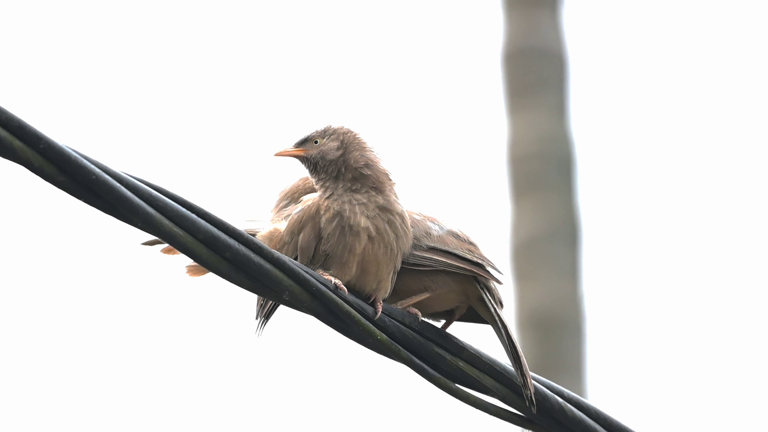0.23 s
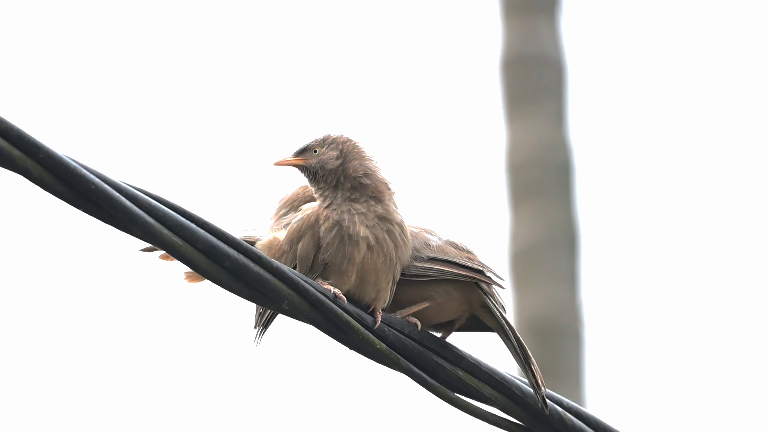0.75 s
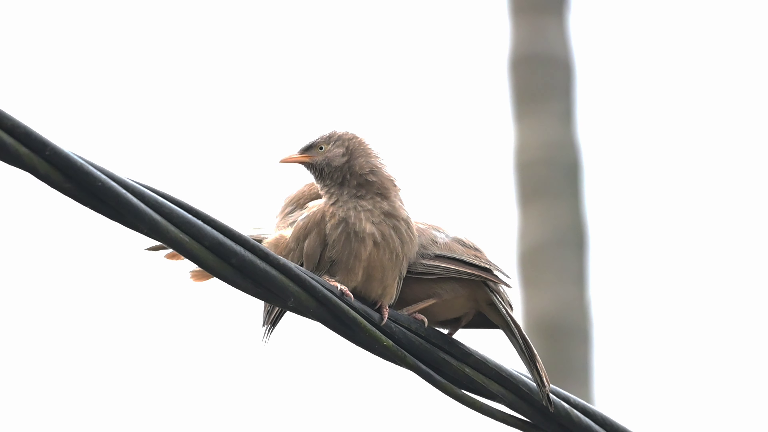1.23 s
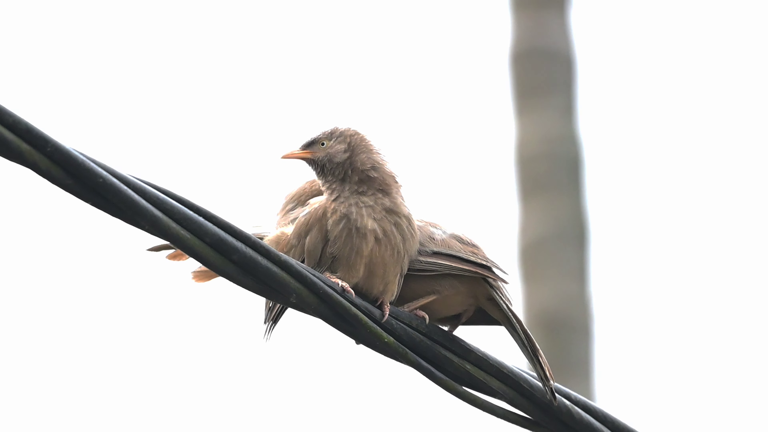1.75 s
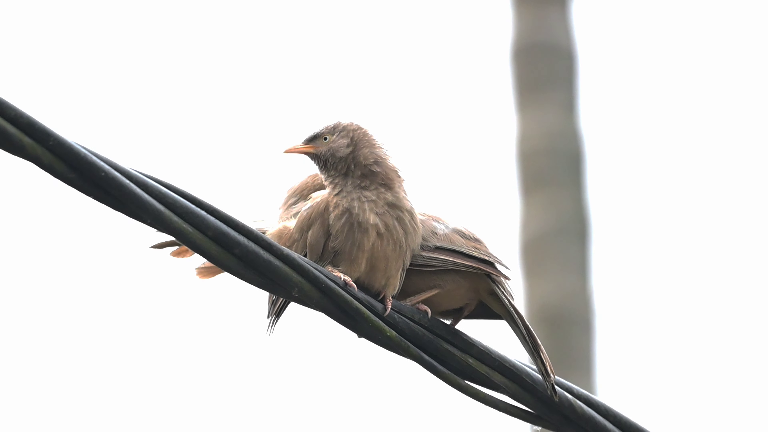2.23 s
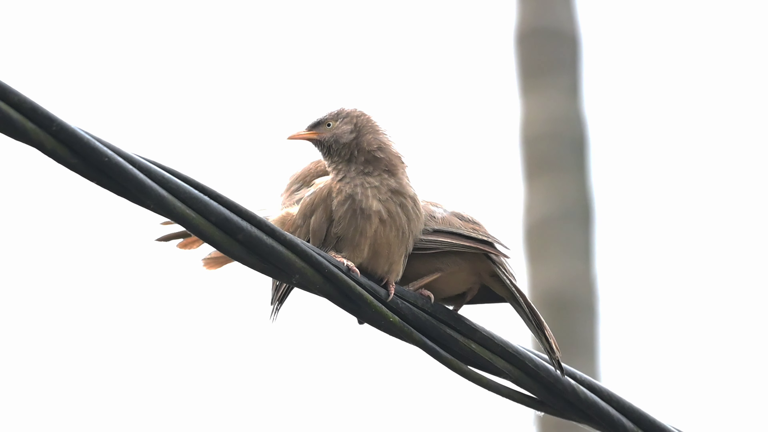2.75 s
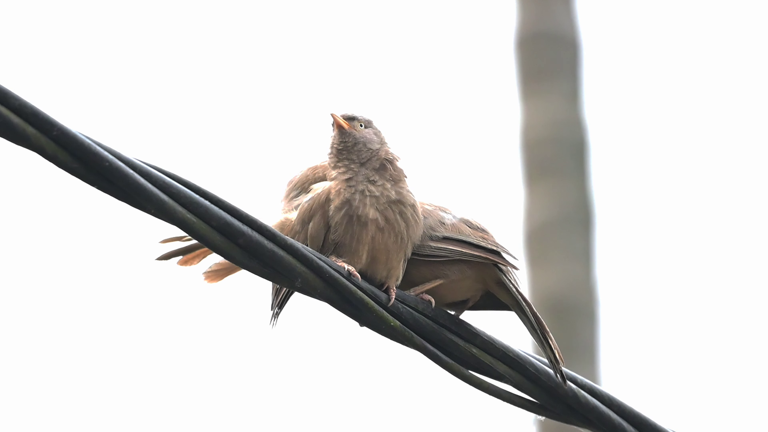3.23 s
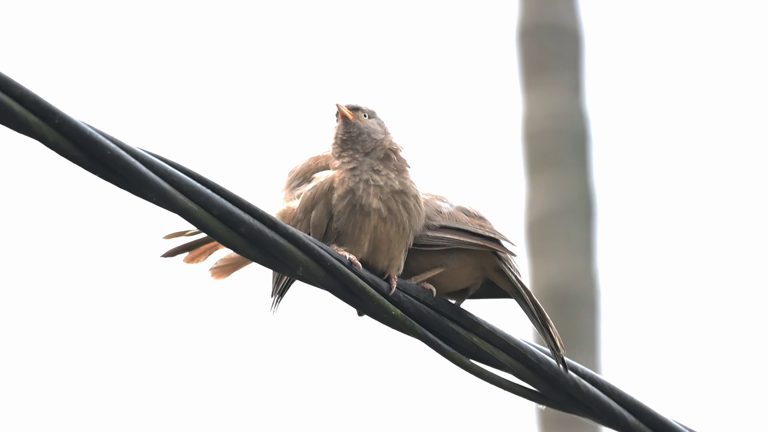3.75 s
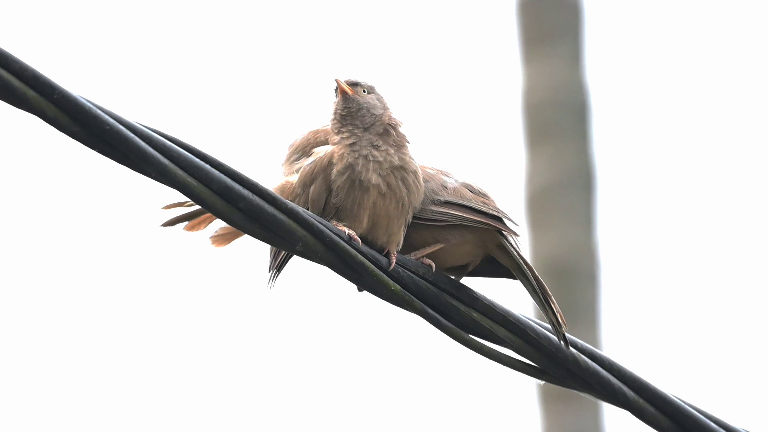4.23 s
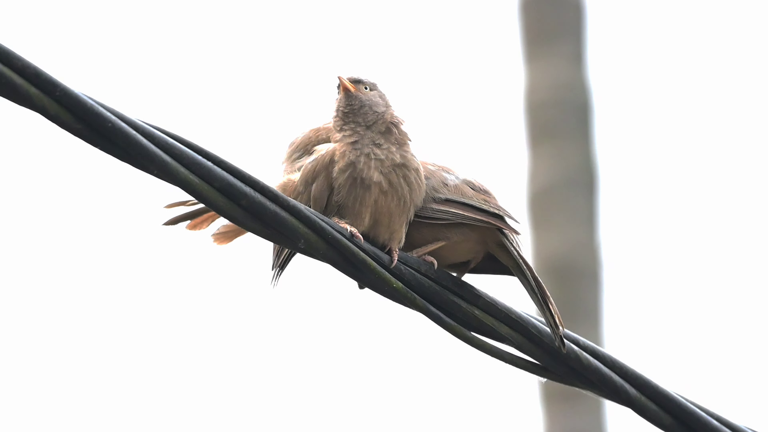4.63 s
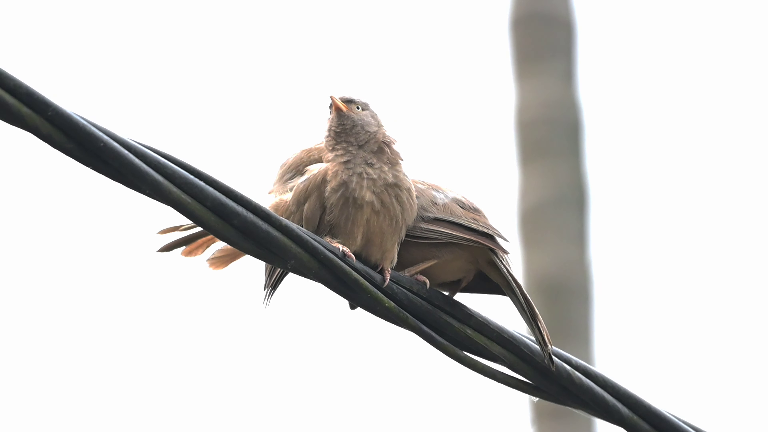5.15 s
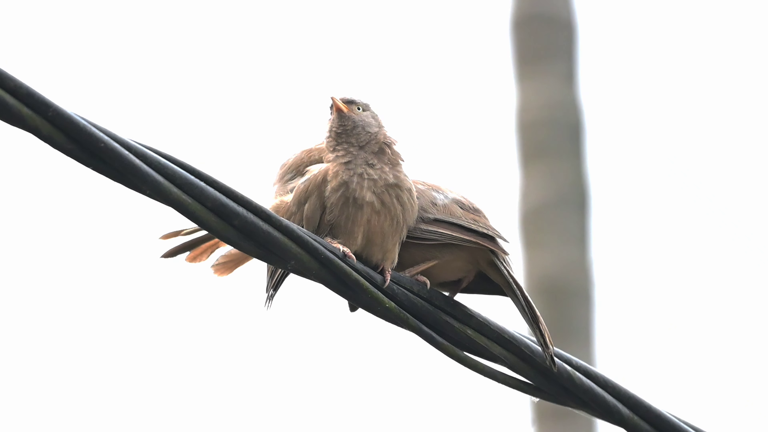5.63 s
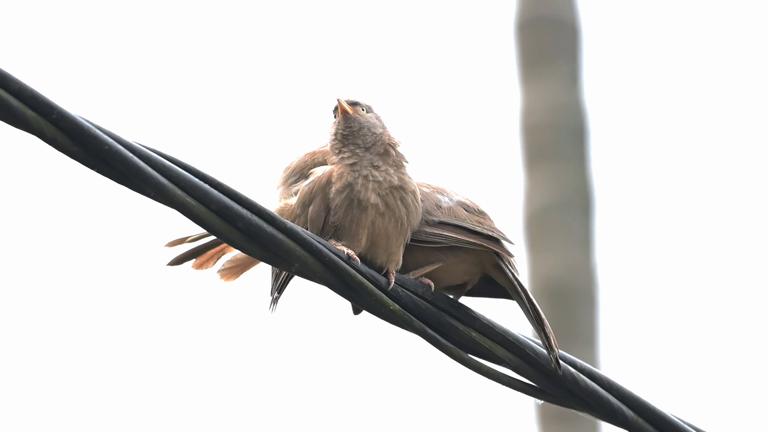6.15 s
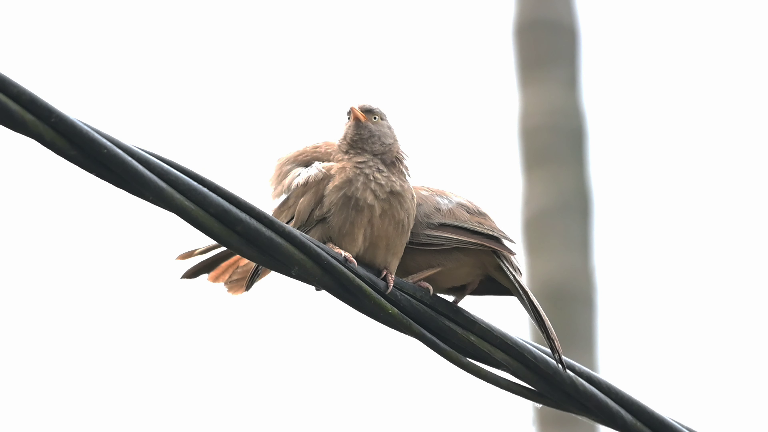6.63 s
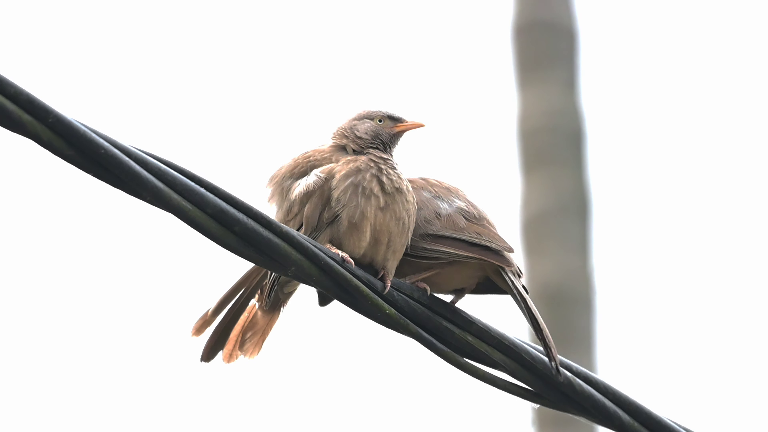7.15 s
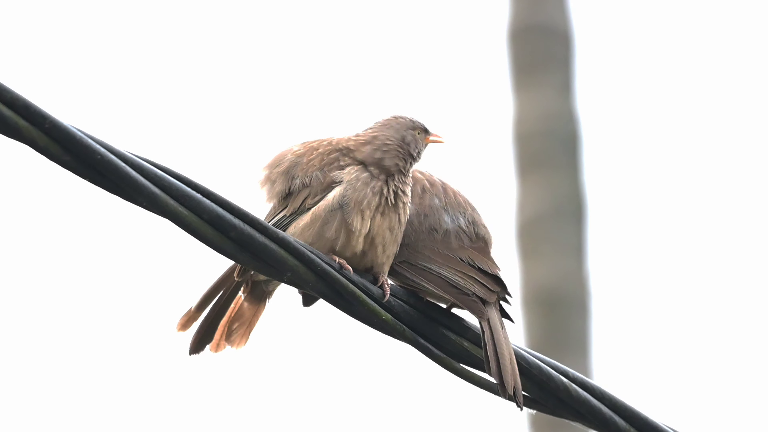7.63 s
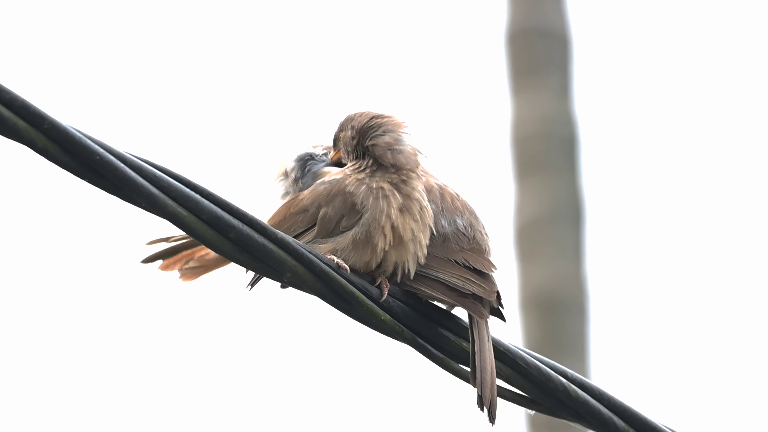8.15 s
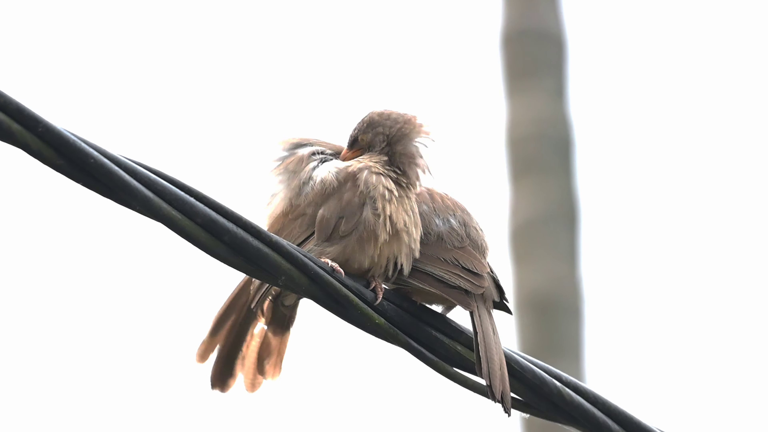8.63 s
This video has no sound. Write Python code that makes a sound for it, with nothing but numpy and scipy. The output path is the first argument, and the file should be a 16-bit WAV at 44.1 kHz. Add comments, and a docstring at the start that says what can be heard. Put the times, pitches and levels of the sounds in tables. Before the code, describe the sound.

Sparse high chirps and faint dove coos open an outdoor scene with a low, distant town rumble. One bird ticks into a short song, a warble buzzes, and a close bird whistles loudly four times, each note dipping and leaping. A dull knock falls among the whistles. After a sudden change, a group of babblers breaks into harsh calls and dense overlapping chatter over softly swelling leaf hiss.

```python
"""Small high chirps come first, scattered over a low town rumble, with a dove's soft coos beneath.
One bird ticks into a song, a warble buzzes past, then a near whistler dips and leaps four times.
Each call is a gliding tone from a bird's syrinx, ringing on among trees and walls; dull knocks fall close.
At 5.5 s the echo stops dead and a second moment of the morning begins: harsh scolds,
thickening chirps and a swelling hiss of leaves."""
import sys
import numpy as np
from scipy import signal
from scipy.io import wavfile
from scipy.ndimage import uniform_filter1d

SR = 44100
rng = np.random.default_rng(int(sys.argv[2]) if len(sys.argv) > 2 else 0)


def dump(signal):
    """Clip the signal to [-1, 1] and save it as 16-bit WAV at the path in sys.argv[1]."""
    limited = np.clip(np.atleast_2d(signal).T, -1, 1)
    pcm = np.round(limited * 32767).astype(np.int16)
    wavfile.write(sys.argv[1], SR, pcm)


N = 392049
CUT_S = 5.496  # the second moment begins
CLEAR_RASP = 0.007  # rasp is pitch shake as a share of the pitch; this little sounds pure

# faders of the bed, one list per moment: t/s, rumble/dB, deep bass/dB, leaves/dB
BED_LEVELS = [
    [(0.0, -61, -72, -85), (0.34, -64, -82, -80), (0.84, -65, -75, -79), (1.15, -63.5, -78, -81.5),
     (1.57, -73, -82.5, -83.5), (2.31, -67, -85, -84.5), (2.74, -63.5, -70.5, -79), (3.64, -62, -68, -83.5),
     (3.88, -55.5, -68.5, -77.5), (4.16, -58.5, -77.5, -86), (4.48, -60, -73.5, -79), (4.98, -63, -78, -76),
     (5.49, -62.5, -71.5, -76)],
    [(5.5, -54, -70, -77), (5.66, -63, -75, -84.5), (5.94, -65, -85, -74.5), (6.14, -61.5, -76.5, -70.5),
     (6.51, -56, -68, -64.5), (6.7, -56.5, -75, -63), (7.13, -57, -76, -63.5), (7.45, -54.5, -74, -59.5),
     (7.68, -56.5, -81, -60.5), (7.88, -55, -81.5, -60.5), (8.26, -53, -76, -58), (8.53, -53, -76, -57),
     (8.89, -52, -76, -56)],
]
# tone colours of the bed: f/Hz, relative density/dB
BASS_SPECTRUM = [(15, -38.5), (25, -7), (97, 15), (140, -5), (180, -40.5), (310, -120)]
RUMBLE_SPECTRUM = [(71, -42.5), (120, -12), (212, -18), (272, -6.5), (413, -2), (512, -5.5), (1040, -15),
                   (1130, -11), (1400, -9.5), (1680, -14.5), (2120, -10.5), (4810, -25), (6250, -48),
                   (10600, -120)]
LEAF_SPECTRUM = [(4500, -7.5), (6000, -1), (8000, -5), (10000, -8.5), (11500, -5.5), (13000, -28.5)]
# the far flock, one list per moment: t/s, level/dB, centre f/Hz
FLOCK_CONTOUR = [
    [(0.0, -73, 3700), (.2, -71, 4480), (.45, -82, 3410), (.93, -69.5, 3600), (1.4, -69.5, 2800),
     (1.55, -95, 3480), (2.03, -77, 3420), (2.25, -88, 4530), (2.58, -63, 4104), (2.9, -51.5, 3527),
     (3.18, -42.5, 2786), (3.45, -47.5, 3290), (3.65, -61, 2984)],
    [(5.5, -67.5, 3313), (5.8, -74.5, 4000), (5.95, -63, 4500), (6.2, -50.5, 2990), (6.55, -47, 4000),
     (6.85, -49.5, 3000), (7.05, -42, 3013), (7.62, -43, 3595), (7.95, -51, 3898), (8.33, -47, 3098),
     (8.65, -52.5, 3450), (8.89, -45, 3284)],
]
# close knocks: t/s, level/dB, ring f/Hz, t60/s, relative scuff level/dB
CLOSE_KNOCKS = [(1.805, -48.5, 263, 0.22, -1), (1.819, -45.5, 492, 0.14, -4), (2.056, -50, 300, 0.17, 2),
                (3.925, -19, 287, 0.14, -15.5), (5.599, -47.5, 660, 0.15, 4),
                (6.564, -31.5, 497, 0.23, -11)]
# thin overload overtones that only the loudest notes bring out:
# multiple of the pitch, relative level/dB at a drive of 1
LOUD_NOTE_OVERTONES = [(2, -40), (3, -60.5), (5, -56.5), (7, -63.5)]
# the dove: t/s, length/s, first f/Hz, last f/Hz, level/dB, rasp, bend, echo send/dB
DOVE_COOS = [(.71, 0.031, 636, 638, -55.5, 0.054, 3, 2), (1.1, 0.14, 502.7, 503, -54, 0.071, -9, -6),
             (2.39, .11, 684, 562, -50, 0.027, 4.5, -2.5), (2.751, 0.15, 516, 513.4, -51, 0.068, 2.5, -5),
             (5.5, .36, 570.6, 647.6, -57, 0.091, 4.5, -7)]
# chirps all around and, at 4.75 s, a faint steady low tone beneath the near whistles: same columns
SINGLE_NOTES = [(0.0, 0.03, 4020, 3430, -45.5, 0.02, 0, -1),
                (0.101, 0.098, 2570, 2850, -58.5, 0.082, 2, -2),
                (.13, 0.14, 1844, 1940, -56.5, 0.08, 4.5, -1.5), (.21, 0.053, 5000, 4810, -56, .05, -1, 4),
                (.29, .03, 2140, 2390, -53, 0.065, -3, -5.5), (.5, 0.068, 2075, 2804, -42, .004, -3.5, -7),
                (0.589, .06, 2790, 3020, -50, 0.0016, 0.5, 4), (.65, .11, 3020, 2870, -50, 0.0032, 0, -5),
                (.51, 0.028, 3540, 3230, -44, 0.0098, -1, -1),
                (0.521, 0.17, 1862, 1949, -49.5, 0.023, 2, -3.5),
                (.55, 0.037, 4170, 3466, -43.5, .02, -1.5, 0),
                (.815, 0.016, 3400, 3216, -43.5, .006, -6, -3.5), (.93, 0.042, 1860, 1876, -61, 0.03, 7, 5),
                (1.14, 0.038, 2580, 2404, -52, 0.044, 3, -4.5), (1.2, .05, 4850, 4550, -56, 0.018, 4.5, -2),
                (1.349, 0.032, 2570, 2370, -56.5, 0.018, -7, -21),
                (1.578, .03, 5020, 5050, -77, 0.036, 4, 10), (1.639, 0.024, 4300, 4150, -74, .01, -4, -3),
                (1.879, .015, 4950, 3630, -62, 0.014, 0.5, -4),
                (1.911, 0.054, 3580, 3360, -63, 0.022, -5.5, 2),
                (1.99, 0.014, 4200, 4150, -66, .008, -10, -1), (2.07, .015, 5150, 4460, -69, 0.0073, -3, 3),
                (2.219, 0.097, 3480, 3070, -67.5, .014, 1.5, -5),
                (2.289, .07, 3050, 3410, -69, .014, 1.5, 0),
                (2.548, 0.048, 2100, 2680, -56, 0.033, -2, -.6), (2.6, .09, 2680, 2335, -64, .03, 0, 1),
                (2.558, .03, 4980, 4500, -47.5, .015, 3, 4), (4.75, 0.46, 830, 818, -68, .03, 0, -5),
                (5.5, 0.1, 2112, 2086, -59, 0.086, -1, 4.5), (5.62, .02, 3520, 3150, -52, .027, 1, -6.5),
                (5.648, 0.021, 3740, 3770, -50.5, 0.018, 0.5, -0.5),
                (5.944, .025, 5200, 3850, -45.5, .012, -2, 0),
                (6.015, 0.016, 3990, 3600, -47.5, .006, -1.5, 3),
                (6.125, 0.014, 5120, 5200, -58, 0.0066, 7, -1), (6.2, 0.054, 3730, 3600, -48, 0.023, -2, 6),
                (6.33, 0.049, 4560, 4730, -49, 0.029, 4.5, 3.5),
                (6.373, 0.027, 5310, 3620, -37, 0.0066, -0.5, -.6),
                (6.411, 0.028, 1690, 2990, -35.5, 0.0054, 1, -1),
                (6.441, 0.059, 2230, 1791, -33, 0.004, 3.5, -4),
                (6.459, 0.024, 4800, 4680, -44.5, 0.049, -6, -0.5),
                (6.565, 0.015, 4800, 4600, -47.5, .006, -2, 2.5),
                (6.589, 0.015, 5140, 3500, -34.5, .007, -1, -1),
                (6.64, 0.084, 8980, 5420, -51, 0.076, 1.5, 2.5),
                (6.679, 0.041, 3390, 2950, -42, 0.053, -0.5, 3.5),
                (6.782, 0.023, 3600, 3430, -48, 0.064, -1.5, 12.5),
                (6.791, 0.027, 5220, 4990, -48.5, 0.068, -0.5, 10.5),
                (6.859, 0.039, 4610, 4700, -51.5, .07, -3, 16),
                (7.12, 0.029, 1502, 2940, -33, 0.0034, 2.5, -6),
                (7.149, 0.086, 2240, 1758, -30.5, 0.005, 4.5, -4),
                (7.33, 0.0089, 4440, 4780, -40.5, .044, 3, -3),
                (7.351, 0.035, 2990, 3010, -34, 0.042, 1, -2),
                (7.38, 0.036, 6240, 6130, -52, 0.056, -3.5, 11),
                (7.41, 0.037, 3400, 3384, -41, 0.058, -3, 2),
                (7.499, 0.051, 4570, 4550, -53, .005, -1.5, -1),
                (7.595, 0.067, 5100, 4005, -31.5, 0.077, 0, -0.5),
                (7.589, 0.069, 3100, 3320, -37.5, .1, 2.5, -1.5),
                (7.699, 0.036, 2930, 3156, -34, 0.063, 2.5, -0.5),
                (7.714, 0.068, 2480, 2445, -38.5, 0.084, -7, -2.5),
                (7.745, 0.013, 4290, 4390, -38.5, 0.0067, 2, -8),
                (7.774, 0.035, 2294, 1862, -36, 0.0046, -0.8, 0),
                (7.864, 0.051, 1706, 1695, -45, .006, -4, -1.5),
                (7.92, 0.014, 4830, 4990, -42, 0.04, -1.5, 1.5),
                (7.995, 0.039, 5280, 2955, -35.5, .006, 0.5, -1),
                (8.05, 0.13, 2326, 2123, -39, 0.047, 5.5, -3),
                (8.177, 0.048, 2346, 2477, -31, 0.0078, 4.5, -7),
                (8.222, 0.028, 2480, 3070, -24, 0.011, 2, 0), (8.31, 0.017, 4870, 6320, -37, .005, 0.5, 3),
                (8.316, 0.032, 2928, 3180, -32, .006, 0, 0.5),
                (8.33, 0.021, 5490, 5570, -36, 0.059, 12, -5), (8.336, 0.027, 7100, 6500, -49, .12, -2, -1),
                (8.336, 0.0344, 4460, 3850, -36.5, 0.146, 0.5, 0.5),
                (8.367, .047, 3900, 2588, -24.5, 0.012, 4, 0.5),
                (8.401, 0.052, 3714, 3120, -26.5, 0.0053, 0.9, -1.5),
                (8.465, 0.069, 1492, 1365, -52, 0.035, -0.5, -8),
                (8.499, .03, 4150, 3620, -34.5, .046, 4.5, -5),
                (8.529, 0.062, 6980, 6100, -48.5, .12, 1, 0.5),
                (8.547, .08, 2120, 1860, -35.5, 0.083, 5.5, -3.5),
                (8.56, 0.058, 2855, 3850, -38, 0.069, -0.5, -9),
                (8.672, 0.053, 4100, 3294, -32, 0.0036, 4.5, 7),
                (8.727, 0.0443, 3320, 3620, -30.5, 0.0039, 0.4, 3),
                (8.775, 0.12, 3590, 3750, -35.5, .015, -2, -2),
                (8.685, 0.013, 5740, 4300, -31, .012, 2.5, 2),
                (8.776, 0.046, 3326, 2096, -24.5, 0.011, 1, -0.5),
                (8.866, 0.046, 1885, 2040, -31.5, 0.0065, 0, -9)]
# ticks that open a song: t/s, level/dB
SONG_TICKS = [(2.184, -62), (2.216, -56), (2.293, -51), (2.393, -45.5), (2.501, -45.5), (2.612, -49.5)]
# its flick-and-slur pairs: t/s, flick level/dB, slur level/dB, slur end f/Hz
SONG_PAIRS = [(2.706, -44.5, -41.5, 2840), (2.874, -39.5, -40.5, 2410), (3.035, -39, -40.5, 2460),
              (3.205, -31, -41, 2610), (3.378, -36.5, -44, 2990)]
# a run of four upturned notes: t/s, first f/Hz, level/dB
CURL_NOTES = [(7.846, 4230, -44.5), (7.96, 3940, -42), (8.075, 4070, -41.5), (8.201, 3930, -37.5)]
# quick arched chips: t/s, length/s, foot f/Hz, top f/Hz, level/dB
CHIP_NOTES = [(0.257, 0.024, 4090, 5030, -39.5), (0.854, 0.033, 3420, 3830, -45),
              (5.902, 0.021, 4210, 4700, -42), (8.709, 0.019, 4160, 4880, -24)]
# harsh scolds: t/s, top f/Hz, fall/s, hold/s, held f/Hz, level/dB, echo send/dB
SCOLD_NOTES = [(6.154, 5090, .042, 0.078, 2618, -31, 0), (6.853, 3800, .032, 0.059, 2610, -25, -0.5)]
# outline of the warble: t/s, lowest f/Hz, highest f/Hz, level/dB
WARBLE_CONTOUR = [(3.157, 1450, 2400, -35), (3.181, 1452, 2510, -27.5), (3.212, 1438, 2652, -27),
                  (3.239, 1438, 2545, -28.5), (3.27, 1489, 2898, -24.5), (3.315, 1620, 2770, -33.5)]
# bright flares in the near whistles: t/s, level/dB, f/Hz
WHISTLE_FLARES = [(3.712, -49, 6630), (3.712, -54, 4500), (3.745, -51.5, 6410), (3.831, -55, 6090),
                  (3.865, -44, 5710), (3.892, -42.5, 5600), (4.252, -45.5, 6554), (4.254, -42.5, 4380),
                  (4.392, -45, 5830), (4.415, -51, 5530), (4.574, -50.5, 5210), (4.608, -49.5, 6970),
                  (4.61, -46.5, 4710), (4.763, -45, 5240), (5.41, -53, 5530)]
# the near whistles: t/s, time to the leap/s, length/s, dip f/Hz, leap f/Hz,
# opening/dB, dip/dB, break/dB, leap/dB, closing/dB
WHISTLE_NOTES = [(3.674, 0.13, .25, 2043, 3040, -30, -16.5, -30, -18, -16),
                 (4.206, .14, .25, 2065, 3012, -29, -16, -27.5, -20.5, -17),
                 (4.567, .13, .225, 2290, 2858, -15.5, -18.5, -47, -21.5, -15.5),
                 (5.206, 0.13, 0.24, 1967, 3001, -28.5, -17, -33, -21.5, -17)]
# pitch before the leap: share of the time, share of the dip
DIP_SHAPE = [(0, -0.089), (.19, .52), (0.381, .92), (0.599, 0.98), (.72, .8), (0.861, -.3)]
# pitch after the leap: share of the time, share of the way home
SAG_SHAPE = [(0, 0), (0.348, 0.16), (.7, .65), (.99, 0.97)]


def undb(db):
    return 10 ** (np.asarray(db) / 20)


def unit_rms(x):
    return x / np.sqrt(np.mean(x ** 2))


def butter(x, order, hz, kind="low"):
    return signal.sosfilt(signal.butter(order, hz, kind, fs=SR, output="sos"), x)


def drift(rate_hz):
    """A smooth random wander with a spread near 1."""
    hold = int(SR / rate_hz)
    steps = np.repeat(rng.standard_normal(N // hold + 1), hold)
    return 1.1 * uniform_filter1d(uniform_filter1d(steps, hold), hold)[:N]


def stereo(mid, side, side_db):
    return np.array([mid + undb(side_db) * side, mid - undb(side_db) * side])


def echo(x, t60, treble_t60, near_t60, near_db, onset_s):
    """Trees and walls: a quick scatter of near reflections, then a dense tail that loses treble first."""
    s = np.arange(int(1.8 * SR)) / SR
    noise = rng.standard_normal((2, len(s)))
    low = signal.sosfiltfilt(signal.butter(2, 4000, fs=SR, output="sos"), noise)
    low_fade, treble_fade, near_fade = (np.exp(-np.log(1000) * s / t) for t in (t60, treble_t60, near_t60))
    tail = low * low_fade + (noise - low) * treble_fade + undb(near_db) * near_fade * noise
    tail *= np.clip(s / onset_s, 0, 1)
    tail /= np.sqrt(np.sum(tail[0] ** 2))
    mid, side = signal.fftconvolve(x[None], tail, axes=1)[:, :N]
    return stereo(mid, butter(side, 2, 3600), side_db=-11)  # the treble stays centred


def noise_bands(spectrum, step_octaves, flicker_db, swell_db):
    """Noise bands that swell together and flicker alone."""
    hz, db = np.transpose(spectrum)
    out, swell = 0, drift(4.6)
    for f in hz[0] * 2 ** np.arange(0, np.log2(hz[-1] / hz[0]), step_octaves):
        edges_hz = [f * 2 ** -step_octaves, f * 2 ** step_octaves]
        mid, side = butter(rng.standard_normal((2, N)), 3, edges_hz, "band")
        band_db = np.interp(np.log(f), np.log(hz), db) + swell_db * swell + flicker_db * drift(9)
        out = out + undb(band_db) * stereo(mid, side, side_db=-18.5)
    return unit_rms(out)


def hum(hz=276):
    """A faint tone that wavers in pitch and level."""
    size = undb(-12.5 + 3.9 * drift(3.8))
    return size * np.sin(2 * np.pi * np.cumsum(hz * (1 + .012 * drift(11))) / SR)


def town_and_leaves(s):
    """The bed: deep bass, town rumble with a hum riding on it, and leaf hiss."""
    t, *faders = np.transpose(BED_LEVELS[0] + BED_LEVELS[1])
    rumble_gain, bass_gain, leaf_gain = (undb(np.interp(s, t, db)) for db in faders)
    bass = noise_bands(BASS_SPECTRUM, step_octaves=.36, flicker_db=1, swell_db=-1.7)
    rumble = noise_bands(RUMBLE_SPECTRUM, step_octaves=.5, flicker_db=1.5, swell_db=.5)
    leaves = noise_bands(LEAF_SPECTRUM, step_octaves=.25, flicker_db=.7, swell_db=.2)
    return bass_gain * bass + rumble_gain * (rumble + hum()) + leaf_gain * butter(leaves, 6, 12400)


def quaver(rate_hz=75):
    """The rasp in a bird's voice: an uneven fast swing with jitter on top."""
    return np.sin(2 * np.pi * np.cumsum(rate_hz + 20 * drift(30)) / SR) + .45 * drift(400)


def add_tone(track, t, hz, db, rasp, shake, edge_s, overtones=()):
    """Adds one gliding tone through the points (t, hz, db); rasp shakes its pitch and level."""
    i = np.arange(max(int((t[0] - edge_s) * SR), 0), min(int((t[-1] + edge_s) * SR), N))
    s = i / SR
    pitch = uniform_filter1d(np.interp(s, t, hz), size=200, mode="nearest")
    phase = 2 * np.pi * np.cumsum(pitch * (1 + rasp * shake[i])) / SR
    fades = np.clip(np.minimum(s - t[0], t[-1] - s) / edge_s + 1, 0, 1) ** 2
    size = fades * undb(np.interp(s, t, db) + 14 * rasp * shake[i])
    drive = np.minimum(size / .33, 1.5)  # only the loudest notes bring out the overload overtones
    upper = sum(undb(level) * np.sin(k * phase) for k, level in overtones if k * max(hz) < SR / 2)
    track[i] += size * (np.sin(phase) + drive * upper)


def far_flock(s, count=600):
    """A wash of far raspy chirps at random moments, most gliding down."""
    t, db, hz = np.transpose(FLOCK_CONTOUR[0] + FLOCK_CONTOUR[1])
    level_db, centre_hz = np.interp(s, t, db), np.interp(s, t, hz)
    level_db[(s > FLOCK_CONTOUR[0][-1][0]) & (s < CUT_S)] = -90  # hushed behind the near whistler
    track, shake = np.zeros(N), quaver()
    for when, height, fall, length, loud in rng.random((count, 5)):
        start = when * N / SR
        first_hz = centre_hz[int(when * N)] * 2 ** (.87 * (height - .5))
        last_hz = first_hz * 2 ** (.2 - .6 * fall)
        add_tone(track, [start, start + .012 + .06 * length], [first_hz, last_hz],
                 [8 * loud, 8 * loud - 3], rasp=.06, shake=shake, edge_s=.008)
    wash = echo(track, t60=.99, treble_t60=.68, near_t60=.033, near_db=20.5, onset_s=.0013)
    return undb(uniform_filter1d(level_db, size=900)) * unit_rms(wash)


def knocks():
    """Each close knock is a short click, a dull ring and a scuff of noise."""
    track, s = np.zeros(N + SR), np.arange(SR // 4) / SR
    click = np.exp(-(s / .00024 - 2) ** 2)
    for t, db, hz, t60, scuff_db in CLOSE_KNOCKS:
        fade = np.exp(-np.log(1000) * s / t60)
        ring = .08 * np.sin(2 * np.pi * hz * s)
        scuff = undb(scuff_db) * signal.lfilter([.3], [1, -.75], rng.standard_normal(len(s)))
        track[int(t * SR):][:len(s)] += undb(db) * (click + fade * (ring + scuff))
    return butter(track[:N], 2, [200, 1800], "band")


def glide(start, length, first_hz, last_hz, db, rasp, bend, echo_db, throat_hz=3550):
    """A note as (t, hz, db, rasp, echo_db), loudest where it comes nearest the throat's resonance."""
    progress = np.linspace(0, 1, 12)
    bend += 1e-6  # above 0 the pitch moves early, below 0 late
    hz = first_hz + (last_hz - first_hz) * np.expm1(-bend * progress) / np.expm1(-bend)
    octaves = np.log2(hz / throat_hz)
    throat_db = np.where(octaves > 0, -26 * octaves, 10.5 * octaves)
    swell_db = np.interp(progress, [0, .35, 1], [-.5, 0, -1])
    return start + length * progress, hz, db + swell_db + throat_db - throat_db.max(), rasp, echo_db


def lone_notes():
    """The dove's coos, scattered chirps and a faint steady low tone beneath the near whistles."""
    return [glide(*row) for row in DOVE_COOS + SINGLE_NOTES]


def song():
    """Falling ticks, then pairs of a clear upward flick and a raspy falling slur."""
    notes = [glide(t, .008, 5800, 4250, db, rasp=.045, bend=0, echo_db=5) for t, db in SONG_TICKS]
    slur_s, slur_rasp, slur_echo_db = np.array([.038, .047, .096]), .025, 0
    for t, flick_db, slur_db, end_hz in SONG_PAIRS:
        notes.append(glide(t, .017, 2950, 3634, flick_db, CLEAR_RASP, bend=0, echo_db=5))
        db = slur_db + np.array([-.5, 0, -2])
        notes.append((t + slur_s, [4620, 4800, end_hz], db, slur_rasp, slur_echo_db))
    return notes


def curls():
    """Clear notes that curl up at the end."""
    return [glide(t, .064, hz, 1.15 * hz, db, CLEAR_RASP, bend=-3, echo_db=-8)
            for t, hz, db in CURL_NOTES]


def chips(foot_db=-13.5, echo_db=-1.5):
    """Quick arches of pitch, loudest at the top."""
    return [([t, t + length / 2, t + length], [foot_hz, top_hz, foot_hz],
             [db + foot_db, db, db + foot_db], CLEAR_RASP, echo_db)
            for t, length, foot_hz, top_hz, db in CHIP_NOTES]


def scolds(rasp=.044, rise_db_per_octave=19, fade_db=6.5):
    """A straight fall that grows louder and lands on a held, fading rasp."""
    notes = []
    for t, top_hz, fall, hold, held_hz, db, echo_db in SCOLD_NOTES:
        levels = [db - rise_db_per_octave * np.log2(top_hz / held_hz), db, db - fade_db]
        notes.append((t + np.cumsum([0, fall, hold]), [top_hz, held_hz, held_hz], levels, rasp, echo_db))
    return notes


def warbler(s, swing_hz=80.9, crest_s=2.1):
    """A whistle swung up and down so fast that it buzzes, loudest at the top of each swing."""
    t, low_hz, high_hz, db = np.transpose(WARBLE_CONTOUR)
    swing = .5 + .5 * np.cos(2 * np.pi * swing_hz * (s - crest_s))
    hz = np.interp(s, t, low_hz) + swing * np.interp(s, t, high_hz - low_hz)
    size = undb(np.interp(s, t, db, -120, -120) - 10 * (1 - swing) ** 2)
    return uniform_filter1d(size, size=100) * np.sin(2 * np.pi * np.cumsum(hz) / SR)


def flares(shake):
    """Rough bright bursts above the near whistle, each sagging a little."""
    track = np.zeros(N)
    for t, db, hz in WHISTLE_FLARES:
        add_tone(track, [t + .004, t + .018], [hz, .98 * hz], [db, db - 3],
                 rasp=.025, shake=shake, edge_s=.008)
    return track


def near_whistler(home_hz=2591, echo_db=-5.5):
    """The lead voice dips from its home pitch, breaks, leaps up and sags back."""
    dip_time, dip_depth = np.transpose(DIP_SHAPE)
    sag_time, sag_depth = np.transpose(SAG_SHAPE)
    notes = []
    for start, leap, length, dip_hz, leap_hz, *levels in WHISTLE_NOTES:
        open_db, dip_db, break_db, leap_db, close_db = levels
        t, sag_s = np.linspace(0, length, 40), length - leap
        dip = home_hz + (dip_hz - home_hz) * dip_depth
        sag = leap_hz + (home_hz - leap_hz) * sag_depth
        hz = np.interp(t, np.r_[leap * dip_time, leap + sag_s * sag_time], np.r_[dip, sag])
        db = np.interp(t, [0, .23 * leap, .62 * leap, .9 * leap, leap, leap + .68 * sag_s, length],
                       [open_db, dip_db, dip_db, break_db, leap_db, close_db, close_db - 9])
        notes.append((start + t, hz, db, CLEAR_RASP, echo_db))
    return notes


def birds(s):
    """The callers as direct sound and echo send; farther birds are wetter."""
    shake = quaver()
    direct = flares(shake)
    send = undb(-12) * direct
    notes = lone_notes() + song() + curls() + chips() + scolds() + near_whistler()
    for t, hz, db, rasp, echo_db in notes:
        add_tone(direct, t, hz, db, rasp, shake, edge_s=.004, overtones=LOUD_NOTE_OVERTONES)
        add_tone(send, t, hz, np.add(db, echo_db), rasp, shake, .004, LOUD_NOTE_OVERTONES[:2])
    # a fast random flutter in the notes' level, as from near reflections
    flutter_db = np.minimum(2.2 * drift(60) + 4.1 * drift(180), 2.5)
    warble = warbler(s)
    return direct * undb(flutter_db) + warble, send + undb(-3.5) * warble


def scene():
    """Birds and their long echo over the far flock, the bed and the knocks."""
    s = np.arange(N) / SR
    direct, send = birds(s)
    echoes = 0
    for moment in (s < CUT_S, s >= CUT_S):  # nothing rings from one moment into the next
        tail = echo(moment * send, t60=2.66, treble_t60=1, near_t60=.21, near_db=9.5, onset_s=.0048)
        echoes = echoes + uniform_filter1d(moment.astype(float), size=60) * tail
    return direct + echoes + far_flock(s) + town_and_leaves(s) + knocks()


def record(dry, ceiling=.99, top_hz=15100):
    """Slight microphone overload bends and rounds the loudest peaks; a steep low-pass trims the top."""
    even_harmonics = butter(undb(-21) * dry ** 2 + undb(-2.5) * dry ** 4, 1, [600, 6500], "band")
    rounded = ceiling * np.tanh(dry / ceiling)
    return signal.sosfilt(signal.ellip(8, .2, 70, top_hz, fs=SR, output="sos"), rounded + even_harmonics)


dry = scene()
out = record(dry)
dump(out)
```